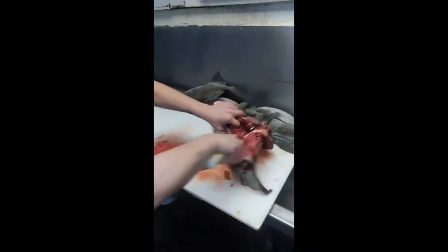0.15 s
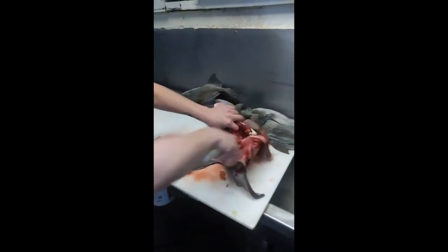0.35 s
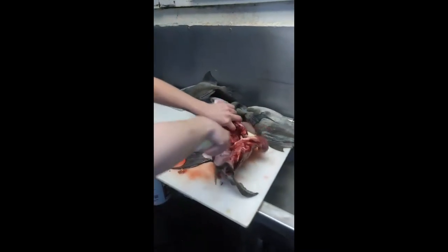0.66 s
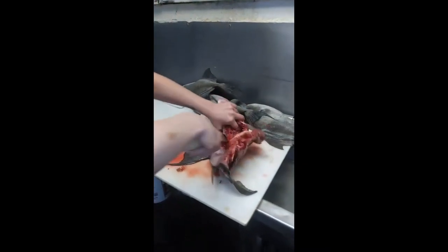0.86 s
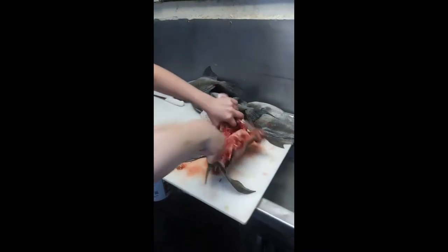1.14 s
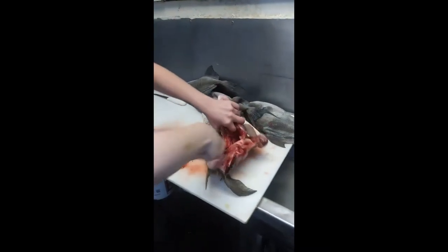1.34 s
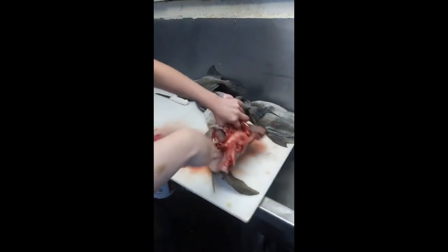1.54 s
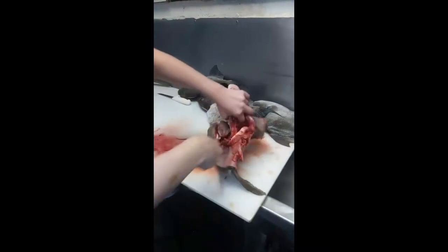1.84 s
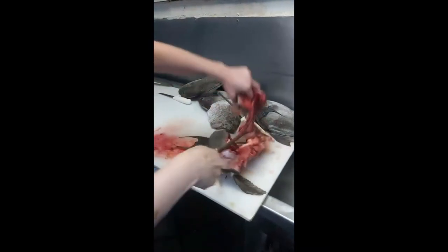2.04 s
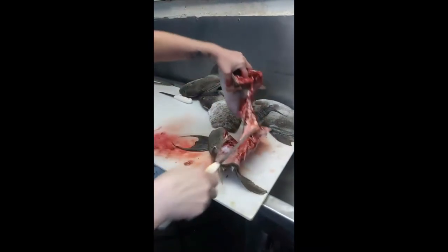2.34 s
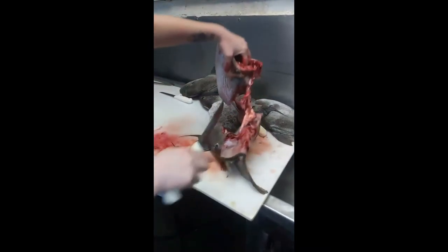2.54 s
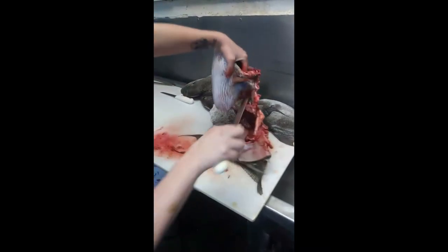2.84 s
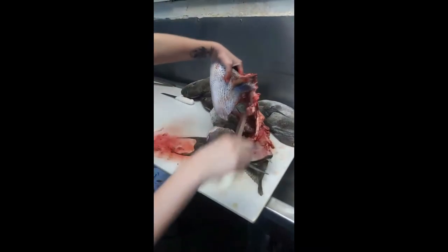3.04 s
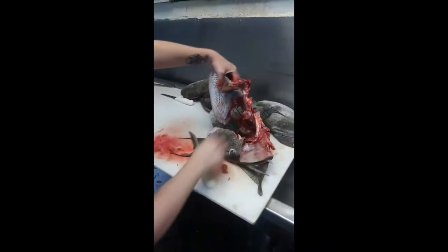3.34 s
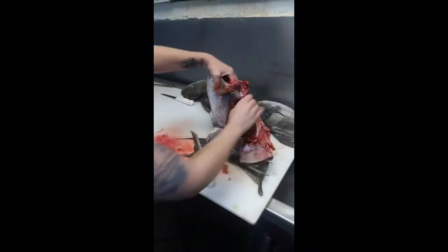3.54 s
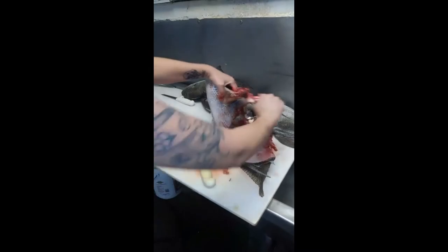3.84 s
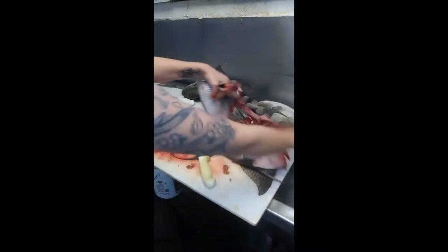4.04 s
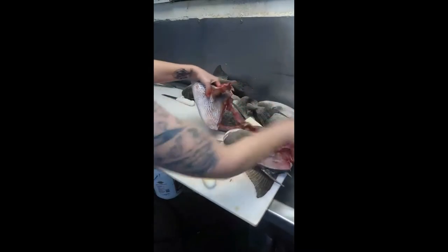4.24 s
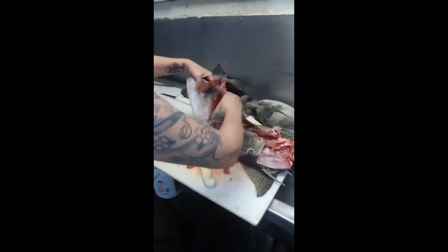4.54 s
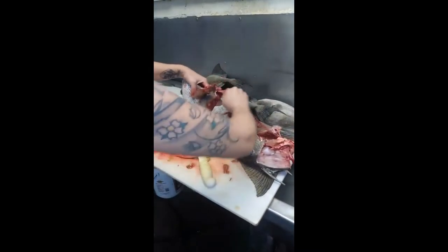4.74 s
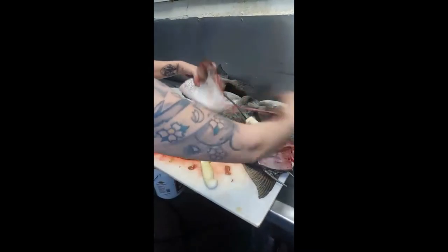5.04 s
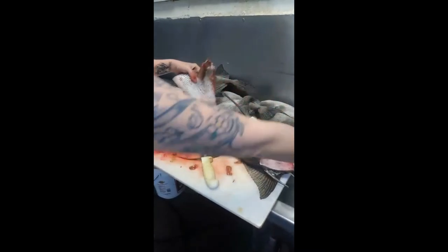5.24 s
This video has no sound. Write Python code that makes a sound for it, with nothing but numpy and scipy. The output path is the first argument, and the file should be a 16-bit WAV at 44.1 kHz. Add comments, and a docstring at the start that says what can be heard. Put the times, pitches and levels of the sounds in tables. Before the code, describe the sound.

Dry, detailed close-up of fish butchery on a plastic board over a steel counter. Irregular crunching and crackling strokes come several per second, then stop. Small wet pops and a faint high scrape lead to a loud clustered thud with splat. A hand then rips thin wet tissue in short bursts, with squeaks between, and a piece smacks down at the end. Low drone and slight hiss sit far behind.

```python
"""A knife crunches through the ribs and wet flesh of a large fish on a plastic board over a steel counter.
Wet pockets squeak, the blade whispers on skin, and something heavy and wet drops with a thump.
Then a hand tears at the wet carcass and a piece slaps down, while a machine drones low behind.
Tearing is a crowd of short ringing grains, snaps and splats are shaped noise bursts, blows also ring
the counter, and the drone is filtered noise. A small room answers the tearing, snaps and blows."""
import sys
import numpy as np
from scipy import signal
from scipy.fft import rfft, irfft, next_fast_len
from scipy.io import wavfile
from scipy.ndimage import uniform_filter1d, map_coordinates

SR = 44100
rng = np.random.default_rng(int(sys.argv[2]) if len(sys.argv) > 2 else 0)


def pcm_store(signal):
    """Save signal as 16-bit PCM."""
    levels = np.round(np.clip(np.atleast_2d(signal), -1, 1) * 32767)
    wavfile.write(sys.argv[1], SR, levels.astype(np.int16).T)


N = 237566
TIME = np.arange(N) / SR   # seconds
RELEASE_DB_PER_S = 230   # how fast a tearing stroke dies away


def from_db(db):
    """Turn decibels into a gain."""
    return 10 ** (np.asarray(db) / 20)


def rms_one(x):
    """Scale a sound so that its average (rms) level is 1."""
    return x / np.sqrt(np.mean(x ** 2) + 1e-20)


def at_hz(points, hz):
    """Read a table of (f/Hz, value) between its points, on a log-frequency axis."""
    table_hz, values = np.array(points)[:, 0], np.array(points)[:, 1]
    return np.interp(np.log(np.maximum(hz, 1)), np.log(table_hz), values)


def cut(x, hz, kind, order=2):
    """Keep only the low, high or middle frequencies (Butterworth filter)."""
    sections = signal.butter(order, np.clip(hz, 10, .45 * SR), kind, fs=SR, output="sos")
    return signal.sosfilt(sections, x + 1e-18)


def colour(x, spectrum):
    """Give a sound a spectrum without smearing it backwards in time; white noise keeps its power."""
    size = 2 * next_fast_len(len(x))
    hz = np.arange(size // 2 + 1) * SR / size
    gain = rms_one(from_db(at_hz(spectrum, hz)))
    # folding the cepstrum makes the filter minimum-phase
    cepstrum = irfft(np.log(gain))
    cepstrum[1:size // 2] *= 2
    cepstrum[size // 2 + 1:] = 0
    response = np.exp(rfft(cepstrum))
    return irfft(rfft(x, size) * response)[:len(x)]


def ring(clicks, hz, t60):
    """A unit click sets a sine of starting height 1 ringing; it falls by 60 dB in t60 seconds."""
    shrink = from_db(-60 / (t60 * SR))
    turn = 2 * np.pi * hz / SR
    return signal.lfilter([0, np.sin(turn)], [1, -2 * shrink * np.cos(turn), shrink ** 2], clicks + 1e-18)


def burst(t60, size=16000):
    """Noise that starts at once and dies away by 60 dB in t60 seconds."""
    return rng.standard_normal(size) * np.exp(-np.log(1000) * TIME[:size] / t60)


def add(out, s, sound):
    """Mix a sound in, starting at s seconds."""
    at = round(s * SR)
    out[at:at + len(sound)] += sound[:max(N - at, 0)]


def drift(rate):
    """Smooth random curve that changes about `rate` times a second; its rms is 1."""
    # drawn at every 40th sample, with a run-in of 2000 points that is dropped
    shrink = np.exp(-80 * np.pi * rate / SR)
    noise = rng.standard_normal(N // 40 + 2002)
    slow = signal.lfilter([1], [1, -2 * shrink, shrink ** 2], noise)[2000:]
    return np.interp(np.arange(N) / 40, np.arange(len(slow)), rms_one(slow))


def evened(x, even_s=0.024):
    """Hold the short-term level near 1, so that only the fine grain is left."""
    span = max(int(even_s * SR), 2)
    power = np.abs(uniform_filter1d(uniform_filter1d(x ** 2, span), span))
    return x / np.sqrt(power + 1e-4 * np.mean(x ** 2))


def swell(s, rise_s, hold_s, release_db_per_s, rise_db=17):
    """Gain that swells by rise_db during the rise before time s, holds at 1 and dies away."""
    early = np.maximum(s - TIME, 0)
    late = np.maximum(TIME - s - hold_s, 0)
    return from_db(-np.minimum(rise_db * early / rise_s + release_db_per_s * late, 120))


def room_echo(build_s=0.0027, size=30000):
    """Diffuse echo of hard walls: builds up in a few ms, each band dies at its own rate; energy 1."""
    # how long the room rings: f/Hz, t60/s
    room_decay = [(150, 0.67), (400, 0.37), (1000, 0.31), (2800, 0.31), (6000, 0.18), (12000, 0.72)]
    edges = np.geomspace(80, 16000, 12)
    tail = np.zeros(size)
    for low, high in zip(edges, edges[1:]):
        t60 = at_hz(room_decay, np.sqrt(low * high))
        tail = tail + cut(burst(t60, size=size), [low, high], "band")
    tail = tail * (1 - np.exp(-(TIME[:size] / build_s) ** 2))
    return tail / np.sqrt(np.sum(tail ** 2))


def echoed(x, echo):
    """What the walls send back."""
    return signal.fftconvolve(x, echo)[:N]


def background(level_db=-49):
    """A machine's rumble in the low room modes, made of filtered noise."""
    # colour of the drone: f/Hz, relative level/dB
    drone_colour = [(20, -21), (45, -16), (60, -9), (73, -2.5), (88, -6), (105, -6), (122, -8), (136, 9),
                    (155, -3.5), (200, -10), (260, -23.5), (330, -26), (450, -27.5)]
    rumble = cut(colour(rng.standard_normal(N), drone_colour), 450, "low")
    return from_db(level_db) * rms_one(rumble)


def counter_rumble(flesh, level_db=-7, low_hz=52, high_hz=84):
    """Bearing down on the flesh shakes the whole counter: low noise follows the smoothed effort."""
    pressure = uniform_filter1d(flesh, size=4000)
    shaking = rms_one(cut(rng.standard_normal(N), [low_hz, high_hz], "band", order=3))
    return from_db(level_db) * pressure * shaking


def slide(width_hz=400, rise_s=0.093, end_s=3.296, fade_db_per_s=74):
    """Friction on wet skin makes the blade whisper in narrow bands, whose pitch follows its speed."""
    # bands that come in one after another: f/Hz before the bend, level/dB, full level from t/s
    blade_bands = [(3340, -56.5, 3.046), (4500, -55.5, 3.113), (5180, -63.5, 3.24)]
    fastest_s, swing_s = 3.21, .11
    bend = .035   # share by which the pitch is raised where the blade is fastest
    speed = np.exp(-((TIME - fastest_s) / swing_s) ** 2)
    turns = np.cumsum(1 + bend * speed) / SR
    out = np.zeros(N)
    for hz, db, s in blade_bands:
        # two slow noises on a cosine and a sine make a noise band around hz
        a, b = cut(rng.standard_normal((2, N)), width_hz / 2, "low", order=4)
        angle = 2 * np.pi * hz * turns
        band = rms_one(a * np.cos(angle) + b * np.sin(angle))
        out = out + from_db(db) * swell(s, rise_s, end_s - s, fade_db_per_s) * band
    return out


def squeaks():
    """Air and juice forced through a small pocket sound at its pitch for a moment."""
    # squeaking and popping pockets: t/s, pitch f/Hz, band width/Hz, peak level/dB, decay t60/s
    wet_pockets = [(1.248, 458, 110, -32, 0.075), (2.25, 3750, 220, -60, 0.072),
                   (2.42, 4610, 220.4, -54, 0.24), (2.58, 5730, 450, -42, 0.22),
                   (2.712, 1490, 150, -49, 0.058), (2.803, 2325, 1100, -42, 0.38),
                   (2.81, 422, 130.5, -42, 0.3), (2.812, 7050, 1200, -46.5, 0.33),
                   (2.897, 4100, 1400, -42, 0.22), (4.321, 317.5, 99, -33.5, 0.13),
                   (4.474, 3706, 179.7, -55, 1), (4.589, 4700, 1390, -45, 0.36),
                   (4.634, 2970, 604, -53.5, 0.16), (5.008, 1030, 150, -46, 0.18),
                   (5.009, 1860, 500, -47, 0.082), (5.167, 4970, 498, -32, 0.097),
                   (5.271, 4780, 701, -39, 0.16)]
    out = np.zeros(N)
    for s, hz, width, peak_db, t60 in wet_pockets:
        squeak = cut(burst(t60), [hz - width / 2, hz + width / 2], "band")
        add(out, s, from_db(peak_db) * squeak / np.abs(squeak).max())
    return out


def blows(push_hz=370, push_t60=.011, push_db=0, rattle_t60=0.13, rattle_db=-14, modes_db=-22, detune=.02):
    """Each blow pushes the board, rattles what lies on it, rings the counter and squirts wet flesh."""
    # blows on the board: t/s, thud gain/dB, contact hardness as treble limit f/Hz, splat gain/dB, splat t60/s
    board_blows = [(2.002, -23.5, 704, -23, 0.085), (3.3681, -21, 1500, -33, 0.16),
                   (3.379, -18, 1167, -40, .1), (3.389, -1, 1320, -15.5, 0.085),
                   (3.3927, -4, 3900, -6, 0.092), (3.4078, -4.5, 2380, -44.5, 0.11),
                   (3.4201, -15.5, 3030, -16, 0.17), (3.432, -5, 1508, -15.5, 0.078),
                   (3.466, -12, 880, -23.5, 0.094), (3.478, -9.5, 1780, -29.5, 0.3),
                   (4.195, -35, 1200, -50, 0.082), (5.361, -28, 2000, -32, 0.24),
                   (5.3724, -13, 3020, -14, 0.095), (5.383, -12, 1510, -15, .05)]
    # ringing modes of board and counter: f/Hz before detuning, relative level/dB, t60/s
    board_modes = [(188, -13.5, .42), (246.5, -5, 0.37), (277.2, -3.5, 0.35), (320, -3.5, 0.34),
                   (370, -8.5, 0.16), (456, -7.5, .24), (499, -6, 0.46), (550, -6, 0.2), (646, -5.5, 0.22),
                   (718, -1, 0.091), (786, -5, 0.19), (893, 3, 0.23), (964, -2, 0.14), (1282, -14, 0.58),
                   (1594, -9, 0.34), (2040, -15.5, 0.24), (2760, -2, 0.25), (2660, -10.5, 0.54),
                   (2840, -3, 0.3)]
    # colour of the rattle: f/Hz, relative level/dB
    rattle_colour = [(60, -32.5), (140, -21), (250, 0.5), (500, -8.5), (750, 3), (950, -5), (1300, -7),
                     (3000, -6.5), (6000, -18.5), (12000, -27)]
    # colour of the wet splat: f/Hz, relative level/dB
    splat_colour = [(200, -7), (800, -6.5), (1400, -3), (2800, 0.5), (4200, -1), (5700, 0.5), (6800, -10),
                    (8500, -20), (11000, -28.5), (13000, -59.5)]
    thuds, splats = np.zeros(N), np.zeros(N)
    for s, thud_db, hard_hz, splat_db, splat_t60 in board_blows:
        click = signal.unit_impulse(SR // 2)
        push = from_db(push_db) * ring(click, push_hz, push_t60)
        rattle = from_db(rattle_db) * colour(burst(rattle_t60, size=len(click)), rattle_colour)
        # the load on the board shifts from blow to blow, and its modes with it
        shifts = 1 + detune * rng.uniform(-0.89, 1, len(board_modes))
        signs = rng.choice([-1, 1], len(board_modes))
        counter = np.zeros(len(click))
        for sign, shift, (hz, db, t60) in zip(signs, shifts, board_modes):
            counter = counter + sign * from_db(modes_db + db) * ring(click, hz * shift, t60)
        add(thuds, s, from_db(thud_db) * cut(push + rattle + counter, hard_hz, "low"))
        add(splats, s, from_db(splat_db) * colour(burst(splat_t60), splat_colour))
    return cut(thuds, 130, "high", order=3) + splats


def fibre_ticks(wet, count=300, per_s=30, over_crackle_db=12.5, spread_db=0.5, edge_hz=3500):
    """Fine fibres part at random moments, as strongly as the tearing is just then: rows for snaps()."""
    gap = rng.exponential(1, count)
    size = np.clip(rng.standard_normal(count), -2, 2)
    s = np.cumsum(gap) / per_s
    wet_db = 20 * np.log10(np.interp(s, TIME, wet))
    peak_db = wet_db + over_crackle_db + spread_db * size
    rows = np.transpose([s, peak_db, np.full(count, edge_hz)])
    return rows[(s < TIME[-1]) & (wet_db > -60)]


def snaps(rows, crack_t60=0.011, usual_edge_hz=2200, level_db=-2, crumble_t60=0.1, crumble_db=-17, uneven_db=5):
    """A crack of a few ms and a gritty crumble; the higher its low edge, as for thin things, the shorter."""
    # colour of a snap: f/Hz, relative level/dB
    snap_colour = [(300, -3), (1500, 2), (2700, 2), (4000, -8), (5200, 7.5), (6600, 1), (8000, -8.5),
                   (10500, -23.5), (13000, -29)]
    out = np.zeros(N)
    for s, peak_db, edge_hz in rows:
        # 100 steps of 30 samples, each with its own random level
        steps = from_db(uneven_db * np.clip(rng.standard_normal(100), -2, 2))
        grit = rms_one(np.repeat(steps, 30))
        crumble = from_db(crumble_db) * grit * burst(crumble_t60, size=len(grit))
        t60 = crack_t60 * np.sqrt(usual_edge_hz / edge_hz)
        fracture = burst(t60, size=len(grit)) + crumble
        crack = cut(colour(fracture, snap_colour), edge_hz, "high", order=3)
        add(out, s, from_db(peak_db + level_db) * crack / np.abs(crack).max())
    return out


def effort(strokes):
    """How hard flesh, bone, sinew and wet film are being torn: four gain curves; the strongest stroke leads."""
    # the soft flesh gives way after the bite, and for longer
    squelch_lag_s, squelch_lingers_s = 0.029, .03
    # sinew tears along with the wet film and with the bone
    sinew_with_wet_db, sinew_with_bone_db = -10, -2.5
    flesh = bone = wet = np.zeros(N)
    for s, rise_s, hold_s, wet_db, bone_db, flesh_db in strokes:
        bite = swell(s, rise_s, hold_s, RELEASE_DB_PER_S)
        squelch = swell(s + squelch_lag_s, rise_s, hold_s + squelch_lingers_s, RELEASE_DB_PER_S)
        wet = np.maximum(wet, from_db(wet_db) * bite)
        bone = np.maximum(bone, from_db(bone_db) * bite)
        flesh = np.maximum(flesh, from_db(flesh_db) * squelch)
    sinew = from_db(sinew_with_wet_db) * wet + from_db(sinew_with_bone_db) * bone
    return np.array([flesh, bone, sinew, wet])


def knife_effort(settle_s=.1):
    """The knife strokes ride on the light, steady pressure of the blade."""
    # knife strokes: bite t/s, rise/s, hold/s, then gains: wet crackle/dB, bone crunch/dB, flesh squelch/dB
    knife_strokes = [(.09, 0.096, .03, -38, -39.5, -49), (.198, .025, .02, -32.5, -44.5, -61.5),
                     (.26, 0.046, 0.029, -28, -37.5, -53), (.40, .03, 0.07, -31.5, -44, -60),
                     (.475, .02, .06, -43, -42.5, -40.5), (.536, .02, .025, -30.5, -43, -49),
                     (.595, 0.066, 0.017, -27, -32, -48), (.735, .045, 0.012, -23, -27, -41),
                     (.885, .05, 0.048, -30.5, -31.5, -56), (1.06, .045, 0.017, -22, -25, -49.5),
                     (1.175, .03, .015, -34, -39, -59), (1.22, .04, .025, -30.5, -35, -59),
                     (1.39, .04, 0.018, -27, -31, -42), (1.515, .025, .035, -29.5, -41, -69),
                     (1.585, .03, .01, -33, -41, -50), (1.637, .01, .005, -43.5, -39.5, -62),
                     (1.756, .035, 0.0035, -24.5, -27, -36.5), (1.875, .015, 0.075, -30.5, -35.5, -48),
                     (2.003, .012, 0.017, -30, -31.5, -36.5), (2.06, .02, 0.0068, -36.5, -40, -51),
                     (2.16, .01, 0.011, -48, -72, -68)]
    # the blade stays in the fish between strokes: from t/s, until t/s, wet/dB, bone/dB, flesh/dB
    resting_blade = (-1.15, 2, -44, -51.5, -68)
    start, end, *levels = resting_blade
    return effort(list(knife_strokes) + [(start, settle_s, end - start, *levels)])


def hand_effort():
    """The hand pulls at the wet carcass, which tears in separate strokes."""
    # tears: t/s, rise/s, hold/s, then gains: wet crackle/dB, bone crunch/dB, flesh squelch/dB
    hand_tears = [(3.69, 0.16, 0.14, -44.5, -61.5, -74), (3.822, 0.082, 0.025, -31.5, -62, -58),
                  (3.875, 0.029, 0.019, -37, -48, -57), (3.935, .015, 0.079, -41, -52, -71.5),
                  (4.07, 0.059, 0.071, -35, -37.5, -45), (4.196, 0.007, 0.0047, -51, -36.5, -62),
                  (4.27, .008, 0.012, -43.5, -50.5, -77), (4.712, .012, 0.059, -38, -62.5, -72),
                  (4.85, 0.056, 0.15, -40, -68.5, -72), (5.01, 0.024, 0.074, -44.5, -69, -73.5),
                  (5.182, 0.06, 0.019, -42.5, -85, -78)]
    return effort(hand_tears)


def grains(low_hz, high_hz, per_s, cycles, wander=.25, wander_rate=18, scatter=.16, spread_db=4.0, count=12000):
    """Fibres and bubbles break at random and ring a few cycles; their pitch wanders as wet pockets open and close."""
    gap, size = rng.exponential(1, (2, count))
    offset, sign = rng.standard_normal(count), rng.choice([-1, 1], count)
    born = np.cumsum(gap) / per_s
    # place in the band: 0 is its low edge, 1 its high edge
    wandering = wander * np.interp(born, TIME, drift(wander_rate))
    place = (.5 + wandering + scatter * offset) % 1
    hz = low_hz * (high_hz / low_hz) ** place
    strength = sign * from_db(spread_db * np.minimum(size, 4)) * (hz / low_hz) ** (3 / 2)
    t, out = TIME[:int(cycles / low_hz * SR)], np.zeros(N)
    for k in np.flatnonzero(born < TIME[-1]):
        fade = np.exp(-np.log(1000) * hz[k] * t / cycles)
        add(out, born[k], strength[k] * np.sin(2 * np.pi * hz[k] * t) * fade)
    return cut(out, [low_hz, high_hz], "band", order=4)


def tearing(gains, spectrum, echo, diffuse_db):
    """Flesh, bone, sinew and wet film give way under each stroke, each with its own kind of grain."""
    # flesh, bone, sinew, wet film: low f/Hz, high f/Hz, grains per s, cycles of ring (to -60 dB), trim/dB
    grain_kinds = [(205, 700, 260, 18, -0.5), (636, 1848, 700, 9.2, -3.5), (1690, 4090, 800, 20, -1.5),
                   (3670, 16500, 1000, 15, -2)]
    out = np.zeros(N)
    for gain, (low, high, per_s, cycles, trim_db) in zip(gains, grain_kinds):
        x = colour(grains(low, high, per_s, cycles), spectrum)
        blurred = x + from_db(diffuse_db) * echoed(x, echo)
        out = out + gain * from_db(trim_db) * evened(blurred)
    return out


def glancing(x, share=0.64, lag_s=.0016, sway=.35):
    """Blade, hand and forearm move close by; their reflection combs the sound with a shifting colour."""
    lag = lag_s * np.exp(sway * drift(3))
    reflection = map_coordinates(x, [(TIME - lag) * SR], order=3)
    return (x + share * reflection) / np.hypot(1, share)


def scene(tear_room_db=-13, snap_room_db=-4, blow_room_db=-6):
    """All sources are close to the microphone; the room answers the tearing, the snaps and the blows."""
    # colour of the tearing under the knife: f/Hz, relative level/dB
    flesh_colour = [(120, -52), (200, -6.5), (296, -12.5), (360, -8.5), (571, -23.5), (890, -7),
                    (1390, -7.5), (1520, -7), (1690, 1), (4330, -1.5), (5170, 3), (6750, -8), (10300, -25),
                    (13300, -30.5), (14000, -81)]
    # colour of the tearing by hand: f/Hz, relative level/dB
    film_colour = [(120, -39), (200, -2), (335, -26.5), (486, -14.5), (635, -24), (990, -17.5), (2130, -18),
                   (2370, -12.5), (3760, -5), (5270, 7.5), (7510, -14), (12600, -45), (14000, -86.5)]
    # bones and wet films snapping; the rows from 5.37 s on are the bright crack of the piece slapping down:
    # t/s, peak level/dB before the trim in snaps(), low edge f/Hz
    sharp_cracks = [(.047, -23, 2000), (.0775, -14, 2000), (.172, -17, 4200), (.2547, -3, 2760),
                    (.356, -18, 1812), (.377, -18, 3000), (.3894, -6, 2350), (.401, -7.5, 2040),
                    (.4347, -17, 2496), (.453, -12.5, 2480), (.531, -12.5, 2430), (.537, -12.5, 2010),
                    (.633, -26, 4500), (.7402, -5, 1500), (.8754, -13.5, 2000), (1.021, -12, 2010),
                    (1.0797, -2, 1110), (1.226, -9, 1560), (1.273, -17, 2000), (1.344, -24, 1500),
                    (1.3735, -14, 1500), (1.509, -12.5, 2000), (1.588, -20, 1190), (1.735, -11, 2000),
                    (1.7555, -4, 1200), (1.7611, -4, 1330), (1.866, -2.5, 2100), (1.876, -9, 1960),
                    (1.8885, -11, 1800), (2, -13.5, 990), (3.821, -13, 4460), (3.827, -15, 4370),
                    (3.851, -14, 4540), (3.875, -25, 4510), (3.8942, -17.5, 3370), (4.058, -14, 3810),
                    (4.0677, -5.5, 2040), (4.0923, -12.5, 2930), (4.1385, -2, 3600), (4.144, -9, 3830),
                    (4.1946, -13.5, 895), (4.2665, -18.5, 3610), (4.5882, -39.5, 4070),
                    (4.675, -27.5, 4480), (4.7038, -18, 4540), (4.711, -10, 4300), (4.717, -12, 4500),
                    (4.747, -16.5, 4500), (4.841, -17, 4370), (4.8984, -13.5, 3500), (4.958, -15, 4590),
                    (5.046, -21, 3500), (5.3585, -19.5, 4430), (5.3736, 1, 3980), (5.375, 4.5, 3000),
                    (5.3775, -5, 3030), (5.379, -10, 3550)]
    echo, knife, hand = room_echo(), knife_effort(), hand_effort()
    steady = slide() + counter_rumble(knife[0]) + background()
    blow = blows()
    snap = snaps(list(sharp_cracks) + list(fibre_ticks(knife[-1] + hand[-1])))
    tear = tearing(knife, flesh_colour, echo, diffuse_db=-4.5)
    tear = tear + tearing(hand, film_colour, echo, diffuse_db=-6.5) + squeaks()
    to_walls = from_db(tear_room_db) * tear + from_db(snap_room_db) * snap + from_db(blow_room_db) * blow
    walls = echoed(to_walls, echo)
    return (glancing(tear + snap + walls) + blow + steady)[None]


def suppress(x, threshold_db=-76, depth_db=-14, size=512):
    """Noise suppressor: narrow bands are turned down whenever they fall near the threshold."""
    overlap = size * 3 // 4
    bins = signal.stft(x, nperseg=size, noverlap=overlap)[2]
    # smooth the power over neighbouring bands, then over time
    power = uniform_filter1d(np.abs(bins) ** 2, size=3, axis=-2)
    power = np.abs(uniform_filter1d(power, size=5, axis=-1))
    gain = np.maximum(power / (power + from_db(threshold_db) ** 2), from_db(depth_db))
    return signal.istft(bins * gain, nperseg=size, noverlap=overlap)[1][:, :N]


def record(dry, top=0.93, treble_hz=11200, hiss_db=-70, cutoff_hz=13300):
    """Quiet bands are suppressed, loud peaks rounded, the treble falls, faint hiss is added and the top is cut."""
    # colour of the hiss: f/Hz, relative level/dB
    hiss_colour = [(300, -11.5), (450, -8.5), (1500, -8), (2400, -16), (5300, -15.5), (9200, -22),
                   (11500, -11.5), (12700, -4), (14000, -22)]
    rounded = top * np.tanh(suppress(dry) / top)
    x = cut(rounded, treble_hz, "low", order=5)
    x = x + from_db(hiss_db) * colour(rng.standard_normal(N), hiss_colour)
    return signal.sosfilt(signal.ellip(10, .2, 70, cutoff_hz, fs=SR, output="sos"), x)


dry = scene()
out = record(dry)
pcm_store(out)
```